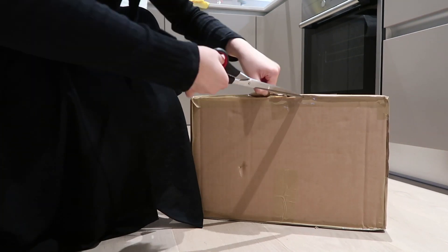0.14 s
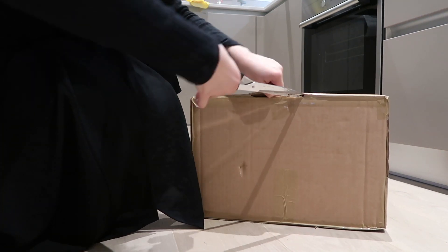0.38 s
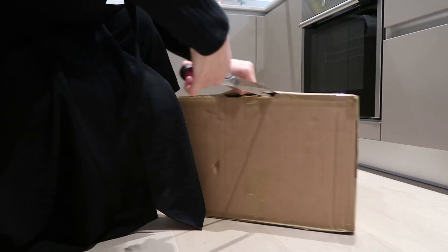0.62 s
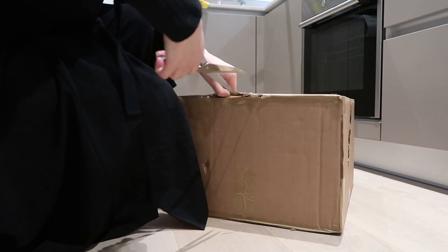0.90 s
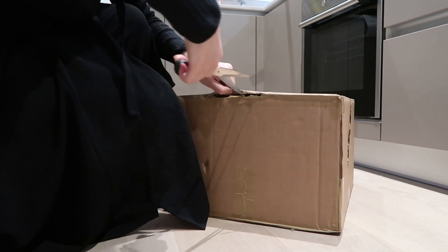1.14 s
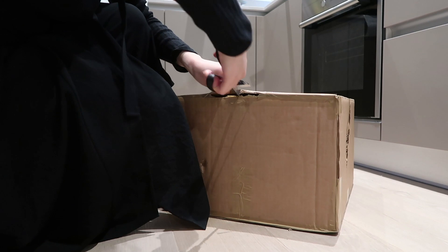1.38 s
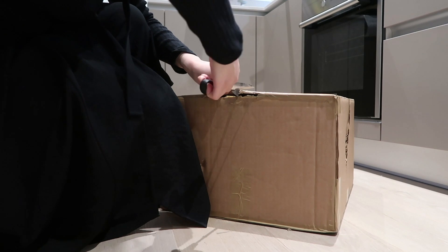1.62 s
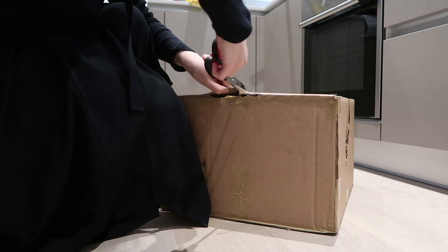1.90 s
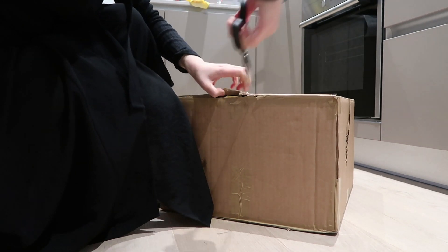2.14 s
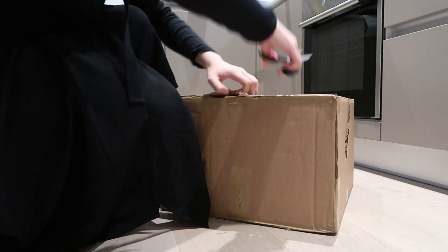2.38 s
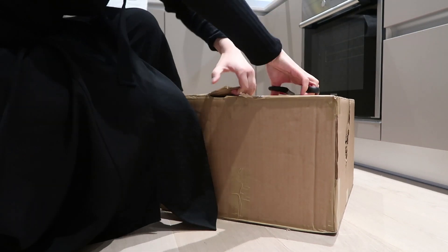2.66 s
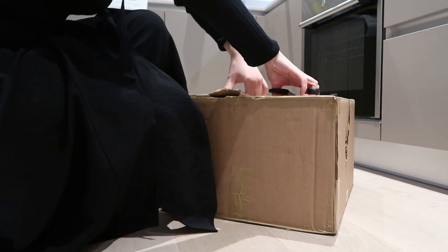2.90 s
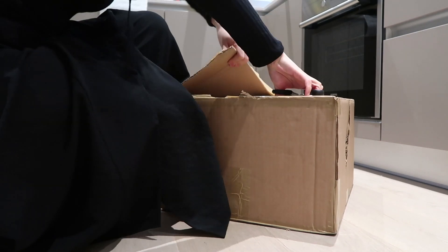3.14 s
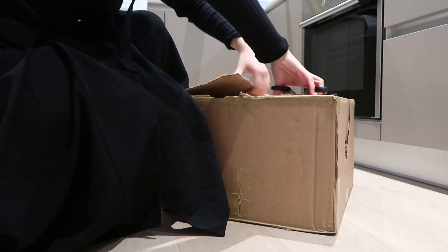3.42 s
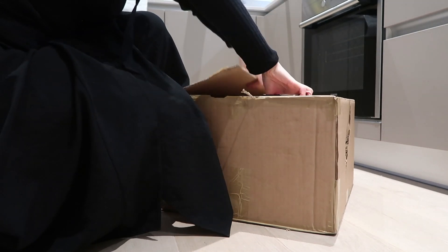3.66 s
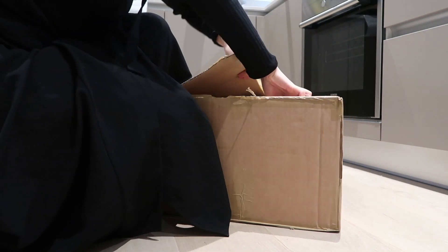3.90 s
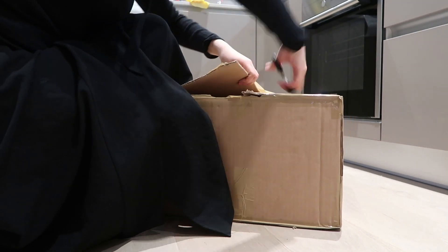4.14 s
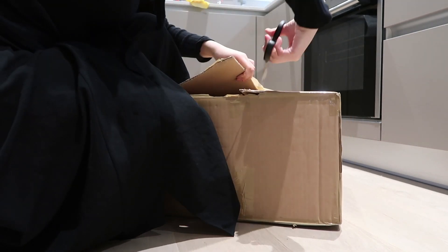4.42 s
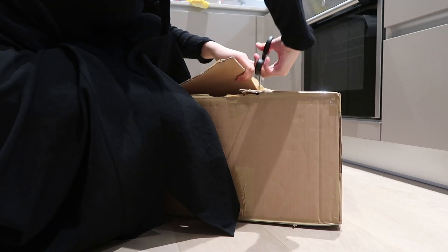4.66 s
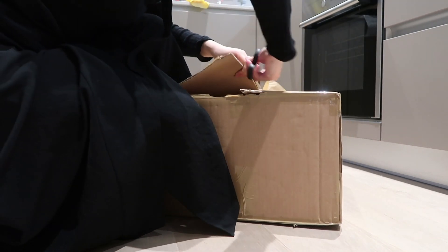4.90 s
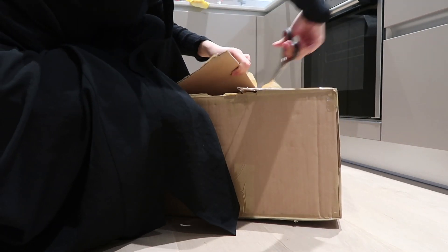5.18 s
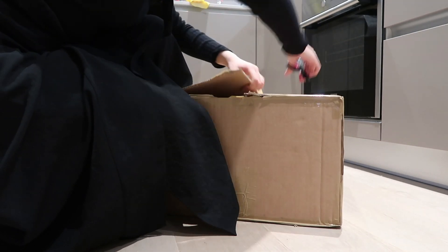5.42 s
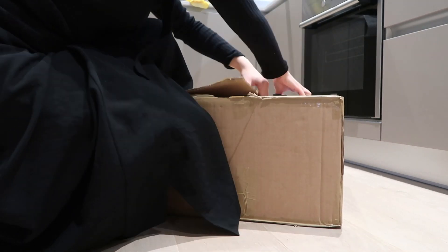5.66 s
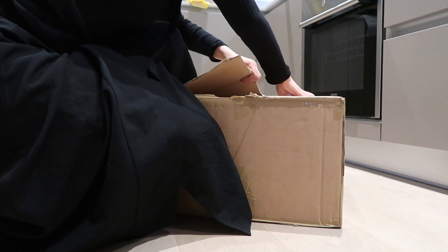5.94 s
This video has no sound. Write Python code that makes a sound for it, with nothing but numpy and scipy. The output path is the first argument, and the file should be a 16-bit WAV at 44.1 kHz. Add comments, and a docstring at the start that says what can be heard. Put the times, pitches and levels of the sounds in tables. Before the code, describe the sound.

A close stereo perspective on a large cardboard box in a small hard kitchen, with short echoes and a faint low rumble and wavering hum beneath. From 0 to 0.9 s, scissors cut tape in irregular dry snaps and ticks, with gritty scraping and a shaken hollow box wall at the start. From 1 to 1.7 s it is much quieter, only faint rubbing and ticks. Around 1.8 s a cluster of snaps and knocks lands, with scraping until 2.3 s. A strong hollow knock comes at 2.64 s, then the loudest thump, crack and rip at 3.1 s. After a lull, rapid tearing cracks burst at 3.8 s. Small ticks and faint rubs follow until 4.7 s. A bright, ringing scissor cut builds from 4.8 s to a piercing snap at 5.0 s. Softer scraping leads to boxy bumps at 5.7 s and snaps, knocks and rough card rubbing at 5.9 to 6 s.

```python
"""Cutting tape on a cardboard box

Scissors cut tape on a large cardboard box on a kitchen floor, and hands tug its flap open.
Snaps, blade ticks and two strong echoes are noise bursts in a broad resonance; knocks are decaying box modes.
Scraping and tearing card is slipping noise under stroke envelopes, with hiss above and shaken walls below.
A small hard room adds echoes and a diffuse tail over a low rumble, heard at two close microphone ports."""
import sys
import numpy as np
from scipy import signal
from scipy.fft import rfft, irfft, next_fast_len
from scipy.io import wavfile
from scipy.ndimage import map_coordinates

SR = 44100
rng = np.random.default_rng(int(sys.argv[2]) if len(sys.argv) > 2 else 0)


def ratio_of_db(decibels):
    """Turn decibels (scalar or array-like) into linear amplitude factors; 0 dB maps to 1."""
    return 10 ** (np.asarray(decibels, float) / 20)


def store_wav(level_fs):
    """Save 16-bit WAV to argv[1]."""
    pcm = np.round(np.clip(np.atleast_2d(level_fs), -1, 1) * 32767)
    wavfile.write(sys.argv[1], SR, pcm.T.astype(np.int16))


N = 266805  # samples in the scene


def unit(x):
    """Normalisation: scales a signal to rms 1."""
    return x / np.sqrt(np.mean(x ** 2) + 1e-20)


def along(points, hz):
    """Interpolation of (f/Hz, value) points on a logarithmic frequency axis."""
    f, v = np.transpose(points)
    return np.interp(np.log(hz + 1), np.log(f + 1), v)


def wobble(rate):
    """Smooth random modulation, interpolated through rate knots a second."""
    knots = rng.standard_normal(int(N * rate / SR) + 4)
    return map_coordinates(knots, [np.arange(N) * rate / SR])


def filtered(x, response):
    """Linear filtering: the spectrum of x times a complex response of frequency."""
    m = next_fast_len(N + SR // 2)
    return irfft(rfft(x, m) * response(np.fft.rfftfreq(m, 1 / SR)), m)[..., :N]


def grit(spectrum, slips, spread_db):
    """Stick-slip noise: uneven slips, in that share of the samples, on steady noise, then coloured."""
    sizes = ratio_of_db(spread_db * np.minimum(rng.exponential(size=N), 2)) * (rng.random(N) < slips)
    rough = rng.standard_normal(N) * (1 + sizes)
    return unit(filtered(rough, lambda hz: ratio_of_db(along(spectrum, hz))))


def add(track, s, sound):
    """Superposition: mixes a sound into the track at time s."""
    part = track[round(s * SR):][:len(sound)]
    part += sound[:len(part)]


# course of the rumble: t/s, relative level/dB
RUMBLE_COURSE = [(0.0, -38), (0.15, -39.5), (1.09, -38), (1.82, -39.5), (2.11, -40), (2.75, -39),
                 (3.02, -37), (3.17, -51), (3.37, -48), (3.74, -45.5), (3.93, -51), (4.08, -46.5),
                 (4.67, -42), (5.34, -42), (5.81, -33), (6.05, -48)]
# spectrum of the rumble noise: f/Hz, relative density/dB per Hz
RUMBLE_SPECTRUM = [(18, -20), (30, -12), (43, 3.5), (55, -3.5), (102, -8), (119, -11), (151, -14.5),
                   (193, -14.5), (250, -17), (320, -29), (550, -120)]


def rumble():
    """Band-limited noise with a frequency-modulated tone: building rumble and a wavering machine hum."""
    hum_hz = 47 + 2.76 * wobble(3.0)
    hum = np.sin(2 * np.pi * np.cumsum(hum_hz) / SR) * ratio_of_db(1.5 * wobble(2.3))
    s, level_db = np.transpose(RUMBLE_COURSE)
    level = ratio_of_db(np.interp(np.arange(N) / SR, s, level_db) - 3.0)
    return level * (grit(RUMBLE_SPECTRUM, slips=0, spread_db=0) + 0.64 * hum)


PEAKED = 1.143  # 1 = a pointed stroke, 2 = a rounded one


def swell(s, rise, fall, db):
    """Amplitude envelope of a stroke: 20 dB below its peak one rise before s and one fall after it."""
    t = np.arange(N) / SR - s
    away = np.minimum(np.abs(t) / np.where(t < 0, rise, fall), 5)
    return ratio_of_db(db - 20 * away ** PEAKED)


# pushes that shake the box walls: strongest at t/s, rise/s, fall/s, relative level/dB
PUSHES = [(0.0, .03, 0.049, -22.5), (.18, .15, 0.089, -51), (.33, .07, 0.3, -33.5), (.75, 0.34, 0.47, -42),
          (1.55, 0.48, 0.24, -46), (1.83, 0.082, 0.15, -26), (2.12, .08, 0.073, -31),
          (2.21, 0.069, 0.028, -34.5), (2.41, 0.059, 0.13, -35), (2.7, .04, 0.14, -26),
          (2.95, 0.11, .12, -35.5), (3.055, 0.014, 0.082, -26), (3.63, 0.12, 0.18, -34),
          (3.85, 0.074, 0.17, -32), (4.11, 0.065, 0.11, -46), (4.24, 0.092, 0.065, -36.5),
          (4.4, 0.21, 0.27, -43), (4.691, 0.046, 0.18, -54), (5.0, 0.049, 0.26, -33.5),
          (5.48, 0.25, .08, -45), (5.74, 0.21, 0.15, -34), (5.93, 0.13, 0.1, -26)]
# modes of the box walls and air: nominal f/Hz, relative level/dB, t60/s of a knock
BOX_MODES = [(74.5, -3.5, 0.17), (103.1, -0.5, 0.12), (133, -2, 0.052), (166, 0.5, 0.13), (188, -1, 0.096),
             (240, -5, 0.13), (287, -3.5, 0.066), (345, 1, 0.037), (427, -0.5, 0.049), (531, 0.5, 0.048),
             (615, 0, 0.045), (740.7, -3, 0.064), (964, -5, 0.084), (1260, -0.5, 0.055)]
REST_BOX_DB = -57.5  # hands and cloth never lie quite still


def shaken_box():
    """Forced vibration: slipping noise drives the box modes as parallel damped resonators."""
    push = ratio_of_db(REST_BOX_DB) + sum(swell(*row) for row in PUSHES)

    def walls(f):
        return sum(ratio_of_db(db) * 1j * f * 4.5 / t60 / (c * c - f * f + 1j * f * 4.0 / t60)
                   for c, db, t60 in BOX_MODES)

    force = grit([(50, -41), (120, 5.0), (1000, -5), (2500, -6.5)], slips=0.0049, spread_db=4.0)
    box = unit(filtered(force, walls))
    return push * ratio_of_db(-4 + 1.45 * wobble(40)) * box


def crackle(count, spread_db):
    """Impulsive excitation: single fibres let go at random, each a few damped cycles of uneven size."""
    draw, t = rng.random((count, 3)), np.arange(SR // 200) / SR
    hz = 1100 * 3.77 ** draw[:, 1:2]
    size = ratio_of_db(spread_db * np.minimum(-np.log(draw[:, 2:] + 1e-9), 2.5))
    where = (draw[:, :1] * N).astype(int) + np.arange(len(t))
    grains = size * np.sin(2 * np.pi * hz * t) * np.exp(-t * hz / 4.4)
    return unit(np.bincount(where.ravel(), grains.ravel(), N + len(t))[:N])


# spectrum of the grit in scraped card: f/Hz, relative density/dB per Hz
CARD_SPECTRUM = [(530, -17), (900, 4), (1230, -5), (1340, -4.5), (1710, -7), (2300, -2.5), (2940, 1),
                 (6000, -11.5), (7800, -34), (13200, -120)]
# scraped card and, at 4.87 s, the scissor cut ring in a narrow resonance: t/s, half length/s, f/Hz, height/dB
CARD_RINGS = [(0.316, 0.067, 1920, 12), (2.068, .04, 2200, 11), (2.674, 0.071, 1520, 16),
              (3.107, 0.036, 1640, 13.5), (4.87, 0.067, 3160, 16), (5.613, 0.027, 1880, 8)]
LASTING_HZ, LASTING_DB = 2020, 4.5  # a lasting resonance under the passing ones


def card_grit():
    """Time-varying resonance: slips and crackle in the card, with moving peaks in their spectrum."""
    rough = grit(CARD_SPECTRUM, slips=0.022, spread_db=4.0) + 1.15 * crackle(count=2500, spread_db=1.0)
    f, t, z = signal.stft(rough, SR, nperseg=256)

    def bump(hz):
        return np.exp(-(np.log(f[:, None] / hz + 1e-9) / 0.23) ** 2) - 1 / 3

    peaks_db = LASTING_DB * bump(LASTING_HZ)
    for s, half, hz, db in CARD_RINGS:
        peaks_db = peaks_db + db * bump(hz) * np.exp(-((t - s) / half) ** 2)
    return unit(signal.istft(z * ratio_of_db(peaks_db), SR, nperseg=256)[1][:N])


# spectrum of the hiss of torn fibres: f/Hz, relative density/dB per Hz
HISS_SPECTRUM = [(2500, -2.5), (4000, 1.5), (5000, 2), (7000, -3.5), (10000, -9), (12500, -7.5),
                 (14600, -19), (15600, -50)]


def fibre_hiss():
    """Partial coherence: common slipping noise plus noise of opposite sign, spread along the seam."""
    common = grit(HISS_SPECTRUM, slips=.004, spread_db=4)
    opposed = grit(HISS_SPECTRUM, slips=0, spread_db=0) * [[1], [-1]]
    return common + 0.6 * opposed


# blades and hands on card: strongest at t/s, rise/s, fall/s, relative scrape level/dB, relative hiss/dB
STROKES = [(0.01, 0.049, 0.14, -29, 2), (.27, 0.042, 0.027, -44, 5), (.42, 0.1, 0.19, -41.5, 1.5),
           (.68, 0.28, 0.42, -39, -5.5), (.81, 0.17, 0.24, -35, -5.5), (1.21, 0.11, 0.06, -53, -6),
           (1.46, .12, .15, -44, -0.5), (1.57, .15, 0.061, -39.5, -1), (1.8, 0.021, 0.13, -32, -5.5),
           (1.9, 0.066, .08, -35.5, -9), (2.16, 0.12, .15, -32.5, -1.5), (2.25, 0.13, 0.038, -40.5, -5),
           (2.43, 0.077, 0.17, -49.5, -1), (2.67, 0.14, 0.27, -33.5, -6.5), (2.86, 0.11, 0.046, -43, -2),
           (2.95, 0.081, 0.092, -28.5, -3.5), (3.084, 0.024, 0.15, -20, -1), (3.14, 0.093, 0.14, -27, -1.5),
           (3.24, 0.06, .12, -30, -7), (3.38, 0.055, 0.21, -50, -23), (3.55, 0.099, 0.16, -51, 6.5),
           (3.64, 0.15, 0.12, -40.5, -7), (3.82, 0.05, 0.22, -21, -5), (3.92, 0.12, 0.29, -36.5, -10.5),
           (4.12, 0.046, 0.1, -47.5, -7), (4.24, 0.044, 0.095, -40, 3.5), (4.67, 0.052, 0.032, -52, 0),
           (4.78, 0.027, .12, -32, -7.5), (4.84, 0.035, 0.15, -27, -6.5), (4.911, 0.087, 0.082, -27.5, 2.5),
           (4.985, .015, 0.059, -31, -1), (5.006, 0.0087, 0.17, -25, -4.5), (5.22, 0.062, 0.2, -40, -5),
           (5.33, 0.069, 0.18, -45, -17), (5.54, 0.087, 0.31, -40, -7), (5.67, 0.17, 0.25, -36.5, 1),
           (5.84, 0.13, 0.18, -33.5, -12), (5.96, 0.13, 0.14, -29, -1), (6.04, 0.081, 0.093, -24.5, -13)]
REST_DB, REST_BRIGHT_DB = -60.5, 1  # scrape of resting hands and cloth, and its relative hiss
TEAR_BRIGHT_DB = -9.5  # hiss gain of a tear
JERK_DB = 1.9  # slow unevenness of a stroke


def rubbing():
    """Stick-slip friction: fibres slip and tear as grit with hiss above, the box walls shaken below."""
    strokes = np.array([swell(*row[:4]) for row in STROKES])
    scrape = ratio_of_db(REST_DB) + strokes.sum(0)
    bright = ratio_of_db(REST_DB + REST_BRIGHT_DB) + ratio_of_db([row[-1] for row in STROKES]) @ strokes
    tear = tearing()
    fibres = (ratio_of_db(-5.0) * scrape + tear) * card_grit()
    fibres = fibres + (ratio_of_db(-5.5) * bright + ratio_of_db(TEAR_BRIGHT_DB) * tear) * fibre_hiss()
    jerks_db = JERK_DB * wobble(60) + 1.0 * wobble(170)  # the stroke sticks and slips
    return ratio_of_db(jerks_db) * fibres + shaken_box()


# tape snaps and blade ticks, with two strong floor or cupboard echoes at 5.0118 s and 5.8944 s:
# t/s, relative level/dB, centre f/Hz, relative treble level/dB
SNAPS = [(.022, -14.5, 1630, -35), (0.0838, -20, 2000, -38), (0.2523, -28, 2170, -16),
         (0.294, -20.5, 1930, -43), (0.3039, -17.5, 1700, -40), (0.3646, -13, 2000, -42),
         (0.436, -18.5, 3100, -19), (0.5057, -25.5, 3140, -29), (0.5517, -24.5, 3640, -18),
         (0.5828, -26, 1800, -26), (.608, -17.5, 1970, -30), (0.7799, -13.5, 2100, -13),
         (.853, -31, 3200, -20), (0.9275, -24, 2200, -36), (1.146, -36, 3460, -22),
         (1.196, -30.5, 1665, -38), (1.246, -33, 2820, -26), (1.3362, -34.5, 1980, -32),
         (1.3907, -36, 3020, -12), (1.7728, -22.5, 1840, -20), (1.7813, -20.5, 1270, -19),
         (1.8319, -17.5, 1170, -21), (1.836, -15, 1990, -7.5), (1.8667, -21, 2040, -31),
         (1.955, -21, 2060, -38), (2.017, -21.5, 1700, -37), (2.0743, -18, 975, -41),
         (2.2737, -28, 1660, -38), (2.3654, -28, 1070, -14), (2.405, -22, 1650, -21),
         (2.5685, -30, 980, -29), (2.593, -30, 1880, -25), (2.6414, -12, 2190, -24),
         (2.877, -22, 2110, -18), (2.9071, -19, 3300, -15), (2.9272, -19, 1880, -14),
         (3.0443, -21.5, 1820, -14), (3.08, -2.5, 2580, -14), (3.105, -13.5, 1770, -31),
         (3.433, -28, 2700, -19), (3.616, -33, 1520, -4), (3.773, -39, 2830, -10), (3.787, -23, 3460, -11),
         (3.7967, -9.5, 2900, -15), (3.8056, -7.5, 2730, -40), (3.8126, -4.5, 2150, -11.5),
         (3.8418, -13, 1300, -38), (3.8554, -11, 1460, -11), (4.11, -33, 2370, -21),
         (4.188, -27.5, 3370, -20), (4.2105, -23, 2130, -32), (4.2384, -25, 2090, -20),
         (4.3915, -32.5, 1490, -11), (4.535, -39, 2800, -14), (4.587, -31.5, 2190, -27),
         (4.655, -40, 3870, -4), (4.776, -25, 1780, -8), (4.9771, -18, 3190, -8), (5.003, -1.5, 3030, -22),
         (5.0118, -9, 1550, -28), (5.2141, -19.5, 3030, -32), (5.5202, -38, 1360, 1.5),
         (5.6002, -25, 1680, -19), (5.6402, -38, 1570, -15), (5.685, -16, 3440, -35),
         (5.692, -16, 3000, -30), (5.697, -16, 1530, -23), (5.8277, -24, 1570, -16),
         (5.851, -21, 2270, -12), (5.885, -4, 1660, -29), (5.8944, -5, 1390, -23), (5.9093, -30, 1550, -34),
         (5.9397, -16, 1470, -7), (6.0127, -10.5, 1010, -16)]
SNAP_T60_S = 0.0093  # every burst dies alike


def snaps():
    """Transient excitation: a dry noise burst in a broad resonance, with a bright crack above."""
    out, t = np.zeros(N), np.arange(SR // 40) / SR
    fibres = signal.butter(3, [1000, 4200], "band", fs=SR)
    bright = signal.butter(2, [4500, 11000], "band", fs=SR)
    fade = ratio_of_db(-60 * t / SNAP_T60_S)
    draws = rng.standard_normal((len(SNAPS), 2, len(t)))
    for (s, db, hz, treble_db), draw in zip(SNAPS, draws):
        burst = draw[0] * fade + 2.67 * (t == 0)  # noise behind a single click
        resonance = signal.lfilter(*signal.iirpeak(hz, 3.2, SR), burst)
        body = signal.lfilter(*fibres, 2.6 * resonance + 0.43 * burst)
        crack = signal.lfilter(*bright, draw[1]) * ratio_of_db(treble_db + 7.0) * fade
        add(out, s, ratio_of_db(db + 1.5) * (body / np.abs(body).max() + crack))
    return out


TEAR_DB = -22  # strength of a tear relative to the table level of its burst


def tearing():
    """Exponential relaxation: each burst starts a tear that runs on and dies away; its strength over time."""
    out, t = np.zeros(N), np.arange(SR // 4) / SR
    for s, db, *_ in SNAPS:
        add(out, s, ratio_of_db(db + TEAR_DB - 60 * t / 0.15) * (1 - np.exp(-t / 0.0028)))
    return out


# knocks on the box: t/s, relative level/dB, f/Hz the struck spot favours,
# relative thud level of the big walls/dB, f/Hz the thud favours
KNOCKS = [(0.023, -17, 704, -21, 91.5), (0.254, -24, 328, -33, 118), (0.262, -51, 240, -27.5, 96.9),
          (0.304, -20, 580, -34, 180), (0.434, -29, 221, -31, 170), (0.777, -28.5, 715, -21.5, 91),
          (1.335, -36, 740, -49, 72.7), (1.57, -33, 407, -36, 72.7), (1.78, -15, 400, -26, 120),
          (1.801, -43, 355, -30, 86.1), (1.837, -11.5, 530, -23, 207), (2.076, -22, 370, -27.5, 137),
          (2.246, -27.5, 460, -31, 184), (2.368, -19.5, 547, -28, 189), (2.417, -31, 254, -26.5, 140),
          (2.569, -25.5, 277, -27, 159), (2.602, -18.5, 342, -26, 180), (2.644, -3, 475, -17.5, 91.5),
          (2.669, -19, 430, -29, 99.6), (2.929, -19, 586, -49, 176), (3.043, -32, 425, -48, 179),
          (3.08, 4, 337, -26, 196), (3.104, -4, 605, -19, 155), (3.13, -10, 423, -25, 121),
          (3.538, -32.5, 312, -45, 159), (3.807, -13, 790, -27.5, 174), (3.842, -9, 770, -32, 199),
          (3.868, -14, 745, -49, 196), (4.134, -31, 450, -54, 159), (4.214, -27.5, 430, -40, 159),
          (4.308, -34, 452, -57, 170), (4.538, -37, 300, -40.5, 180), (4.584, -33.5, 740, -49, 159),
          (4.705, -36, 600, -51, 160), (4.789, -26.5, 720, -35, 97), (4.978, -26, 748, -27.5, 72.7),
          (5.003, -11, 585, -29, 218), (5.039, -21.5, 260, -23.5, 121), (5.211, -25, 526, -35, 72.7),
          (5.668, -29, 277, -31, 140), (5.691, -10, 221, -14.5, 218), (5.7, -11, 310, -19.5, 165),
          (5.729, -21, 345, -35, 188), (5.888, -15, 850, -32, 116), (5.896, -12, 226, -50, 216),
          (6.015, -11, 660, -23.5, 164)]
ABOVE_SPOT_DB = 2  # extra loss per octave above the favoured mode


def knocks():
    """Modal synthesis: a blow rings upper box modes near the struck spot's, and thuds the big walls."""
    out, t = np.zeros(N), np.arange(SR // 4) / SR
    hz, level_db, t60 = np.transpose(BOX_MODES)[:, :, None]
    low = hz < 220  # modes of the big walls
    draws = rng.standard_normal((len(KNOCKS), len(BOX_MODES), 3))
    for (s, db, spot_hz, thud_db, thud_hz), draw in zip(KNOCKS, draws):
        octaves_off = np.abs(np.log2(hz / np.where(low, thud_hz, spot_hz)))
        octaves_above = np.maximum(np.log2(hz / spot_hz), 0)
        gains = ratio_of_db(level_db - 11.0 * octaves_off - ABOVE_SPOT_DB * octaves_above + 4.4 * draw[:, :1])
        thud_scale = ratio_of_db(thud_db + 8) / np.linalg.norm(gains * low)
        ring_scale = ratio_of_db(db) / np.linalg.norm(gains * ~low)
        gains = gains * np.where(low, thud_scale, ring_scale)
        phase = 2 * np.pi * hz * (1 + 0.051 * draw[:, 1:2]) * t + 2.22 * draw[:, 2:]
        ring = gains * ratio_of_db(-60 * t / t60) * np.sin(phase)
        add(out, s, (ring * (1 - np.exp(-t * hz * 3.44))).sum(0))  # big walls take longer to start
    return out


# early echoes, from either side in turn: delay t/s, level/dB
EARLY_ECHOES = [(.0025, -10), (.0055, -12.5), (.009, -12.5), (.014, -11.5), (.024, -15.5)]
PORT_LAG_S = .00004  # an echo from one side reaches the far port later


def early_echoes(x):
    """Early reflection: delayed copies off floor and cupboards, with a time difference between ports."""
    lag = PORT_LAG_S * np.array([[.5], [-.5]])

    def response(hz):
        return 1 + sum(ratio_of_db(db) * np.exp(-2j * np.pi * hz * (s + lag * (-1) ** k))
                       for k, (s, db) in enumerate(EARLY_ECHOES))

    return filtered(x, response)


# decay of the room: f/Hz, t60/s
ROOM_T60 = [(100, 0.16), (500, 0.47), (1500, 0.35), (4000, 0.34), (10000, 0.27)]
# left-right correlation of the noise that forms the tail: f/Hz, correlation (0-1)
TAIL_LIKENESS = [(60, .9998), (125, .998), (250, .99), (500, .993), (1000, .993), (2000, .96), (4000, .55),
                 (8000, .15), (14000, .2)]


def kitchen(x):
    """Diffuse reverberation: decaying noise, drawn anew every quarter second."""
    out, step = np.zeros((2, N + 2 * SR)), SR // 4
    for start in range(0, N, step):
        hz, t, z = signal.stft(rng.standard_normal((2, 3 * step)), SR, nperseg=256)
        turn = np.arccos(np.clip(along(TAIL_LIKENESS, hz), -1, 1))[:, None] / 2
        mid, side = z[0] * np.cos(turn), z[1] * np.sin(turn)  # the ports hear the bass alike
        decay = ratio_of_db(-60 * t / along(ROOM_T60, hz)[:, None])
        tail = signal.istft(np.array([mid + side, mid - side]) * decay, SR, nperseg=256)[1]
        tail = tail / np.linalg.norm(tail[0])
        wet = signal.fftconvolve(x[None, start:start + step], tail, axes=1)
        out[:, start + 300:start + 300 + wet.shape[1]] += wet  # the tail waits 300 samples
    return out[:, :N]


def scene():
    """Superposition of the sources, the floor and cupboard echoes, and the room tail."""
    ticks, blows, rub = snaps(), knocks(), rubbing()
    tail = kitchen(ratio_of_db(-9.5) * ticks + ratio_of_db(-8) * blows + ratio_of_db(-6.5) * rub.mean(0))
    return early_echoes(ticks + blows) + rub + tail + rumble()


# phase between the ports: f/Hz, lead of the left/rad
PORT_LEAD = [(60, 0), (1000, -.03), (2700, -.12), (4500, -.4), (6100, -.7), (7500, -1.4), (8700, -2.5),
             (11300, -3), (13000, -2.3), (15200, -.6)]
# gain of the left-right difference, most reduced in the bass by close ports: f/Hz, gain/dB
SIDE_GAIN = [(60, -23), (125, -10), (250, 3.5), (500, 2.5), (1000, -2), (3000, -1.5), (8000, 0.5),
             (13000, -2.5)]


def low_pass(x):
    """Removes everything above the highest recorded frequency."""
    return signal.sosfilt(signal.butter(12, 15680, fs=SR, output="sos"), x)


def record(dry):
    """Two-port reception: ports differ in phase and slightly in treble level; loud peaks clip softly."""
    def port_response(hz):
        left_db = along([(200, 0), (3000, -.45), (14000, -.15)], hz)  # the right gets the opposite
        sign = np.array([[1], [-1]])
        return np.exp(.5j * along(PORT_LEAD, hz) * sign) * ratio_of_db(left_db * sign)

    ports = filtered(dry, port_response)
    mid = ports.mean(0)
    side = filtered((ports[0] - ports[1]) / 2, lambda hz: ratio_of_db(along(SIDE_GAIN, hz)))
    ports = np.array([mid + side, mid - side])
    mix = ports / (1 + np.abs(ports) ** 6) ** (1 / 6)  # soft clipping
    return low_pass(mix)


dry = scene()
out = record(dry)
store_wav(out)
```